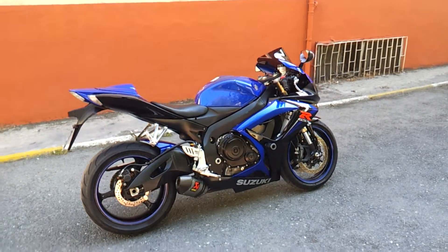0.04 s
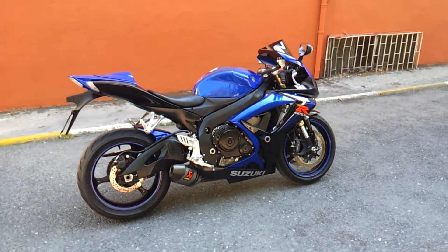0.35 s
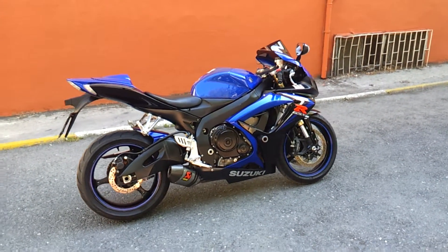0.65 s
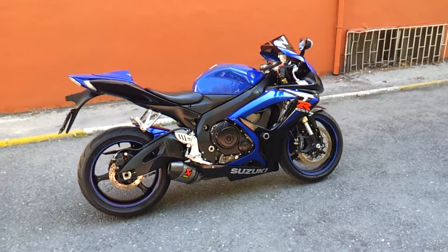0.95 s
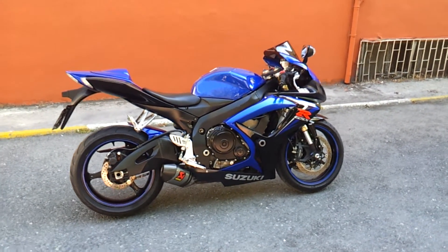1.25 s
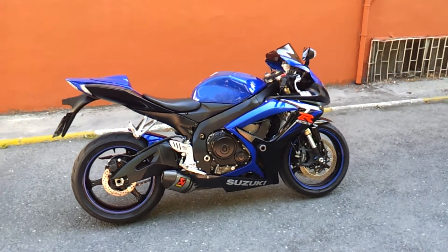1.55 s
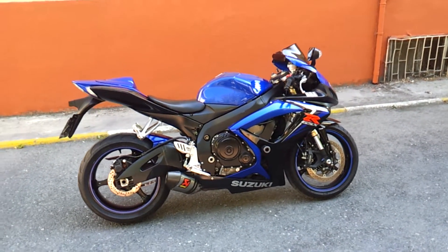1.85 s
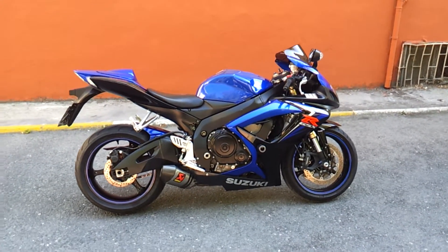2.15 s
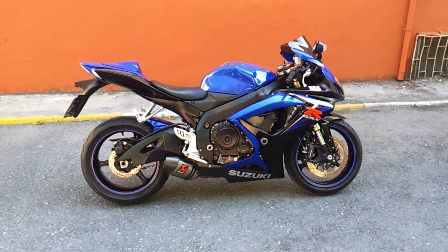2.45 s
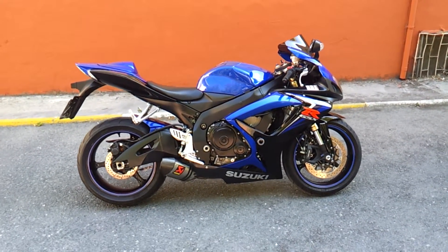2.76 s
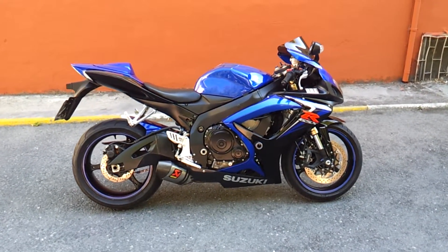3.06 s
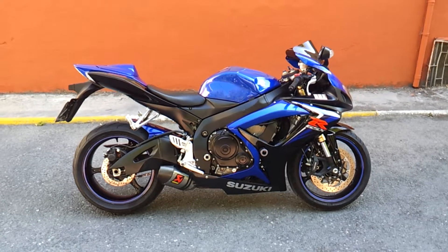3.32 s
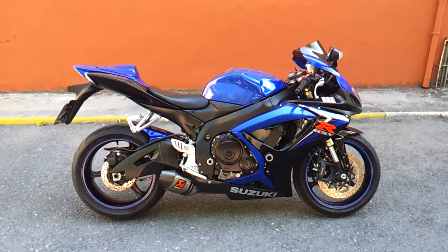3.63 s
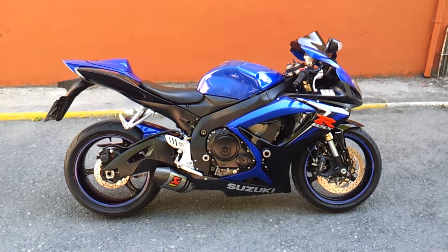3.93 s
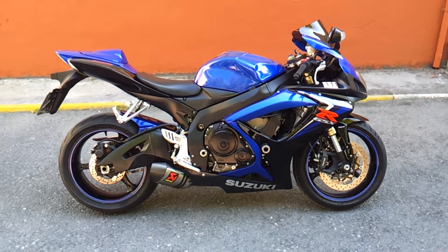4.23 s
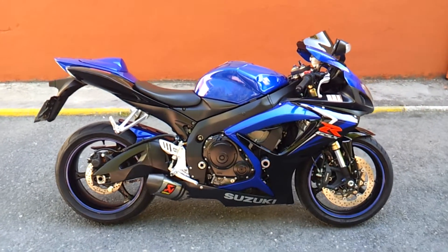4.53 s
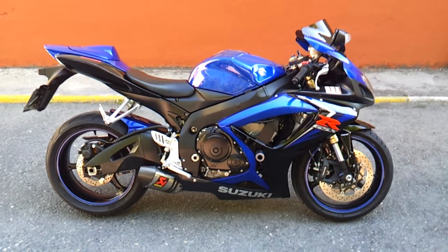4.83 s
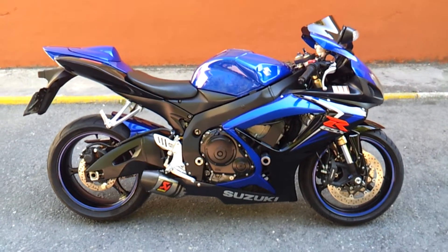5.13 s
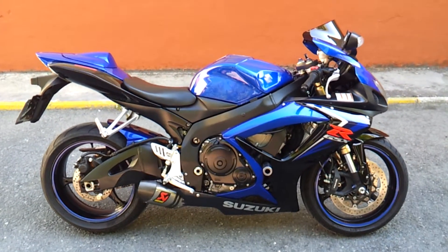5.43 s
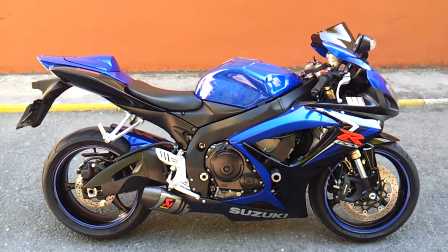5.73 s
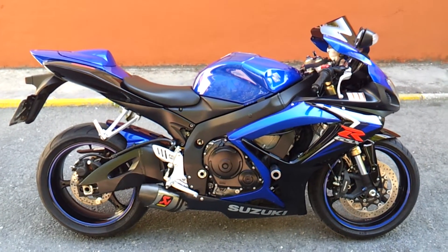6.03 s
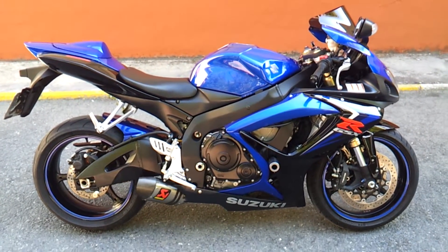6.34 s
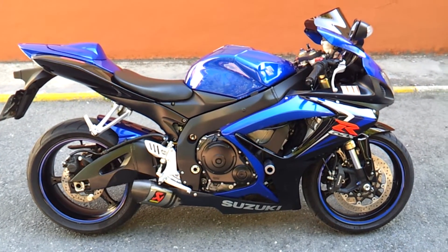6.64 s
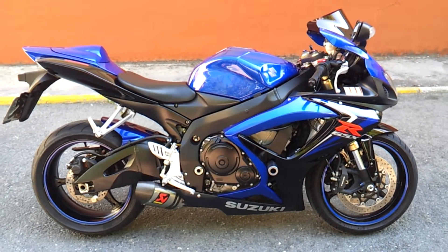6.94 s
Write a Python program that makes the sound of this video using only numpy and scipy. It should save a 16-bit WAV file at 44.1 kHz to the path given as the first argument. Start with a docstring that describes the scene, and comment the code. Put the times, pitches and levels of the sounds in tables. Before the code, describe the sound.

A quiet hum of distant traffic and an airy hiss fill a narrow street for about seven seconds. Wind rumbles on the microphone at the start, with several low thumps between 0.3 and 1 second, and is gone by about 2 seconds. A nearby bird gives six short, harsh, high squawks from 0.3 to 2.9 seconds, roughly half a second apart, each falling in pitch and echoing off the walls. After a pause, three more come at about 3.8, 4.2 and 4.6 seconds, the middle one the raspiest. Just after 4.6 seconds, one sharp, close click with a soft rebound sounds on the hand-held device's case, the loudest peak. Shoes scuff faintly on asphalt, mostly between 4 and 6 seconds. Small distant birds chirp now and then from about 1 second, with a few thin whistles, and chirp more often from 5.6 seconds to the end.

```python
"""A squawking bird in a narrow street

A bird gives nine harsh, falling squawks, made in its voice box and shaped by its throat and beak.
The walls throw them back. Other birds chirp and whistle farther off, over the hum of the town.
Wind thumps on the microphone at first, shoes scuff the asphalt, and one sharp click with a soft
rebound rings the case of the hand-held recorder."""
import sys
import numpy as np
from scipy import signal
from scipy.fft import rfft, irfft
from scipy.io import wavfile
from scipy.ndimage import map_coordinates

SR = 44100
rng = np.random.default_rng(int(sys.argv[2]) if len(sys.argv) > 2 else 0)


def put_to_file(sound):
    """Save the sound as 16-bit audio at rate SR, in the file named by the first command-line argument."""
    columns = np.atleast_2d(sound).T  # one column per channel
    safe = np.clip(columns, -1, 1)
    whole_steps = np.round(safe * 32767)
    wavfile.write(sys.argv[1], SR, whole_steps.astype(np.int16))


N = 307818
T = np.arange(N) / SR


def squawking_bird(breath_db=-11, breath_flicker_db=3.0):
    """The near bird: a harsh voice and rushing breath pass through the same throat."""
    # (start [s], length [s], pitch [Hz], end pitch [Hz], lateness of the fall [power], level [dB],
    #  level change by the end [dB], rasp [0-1], opening flick [share of the pitch])
    squawks = [(0.338, .175, 2358, 1354, 5.6, -43.5, 2, 0.43, -.18),
               (0.721, .160, 1940, 1220, 3.16, -41.5, -6, .06, .24),
               (1.2, 0.15, 1894, 1170, 3.33, -41, -7, 0.09, 0.21),
               (1.768, 0.15, 1980, 1177, 3.36, -39, -6.5, 0.02, 0.055),
               (2.252, .157, 2054, 1200, 2, -41.5, -6.5, 0.15, .22),
               (2.748, 0.15, 2103, 1259, 2.2, -39, -6, 0.19, .15),
               (3.788, .156, 2181, 1359, 5.2, -36.5, -6, .45, .18),
               (4.153, .158, 2230, 1680, 2.8, -38.5, -2, 0.91, .1),
               (4.558, 0.13, 2155, 1597, 1.9, -41.5, -4, .15, 0.084)]
    # strength of harmonics 1 to 8, the whole multiples of the pitch (level [dB])
    harmonics = [-4.5, 2, -6.5, -2, -4, -9, -16, 0.5]
    # how throat and beak colour the voice (frequency [Hz], gain [dB])
    throat = [(1100, -2.5), (1750, -2), (2400, -7.5), (2900, -5), (3700, -0.5), (4400, -3), (5300, -10),
              (6100, 1), (6900, -2), (7700, -12.5), (9000, -13), (10500, -22.5), (15000, -39)]
    # in two harsh squawks the other side of the voice box holds a note of its own
    # (start [s], length [s], start pitch [Hz], end pitch [Hz], level [dB], rasp [0-1])
    held_notes = [(.390, 0.137, 2530, 2380, -59, 0.16), (4.160, 0.11, 2536, 2510, -52.5, .05)]
    calls = [squawk(*row) for row in squawks]
    voice = voice_box(calls, harmonics, throat, jitter=0.1023, flutter_hz=562.2, shimmer_db=5.0,
                      closed_db=-16, split=0.14)
    airflow = 0
    for rows in calls:
        _, level_db, rasp = in_time(rows)
        calling = (T > rows[0][0]) & (T < rows[-1][0])
        airflow = airflow + from_db(level_db) * np.sqrt(np.abs(rasp)) * calling
    air = signal.sosfilt(signal.butter(2, 4000, "high", fs=SR, output="sos"), noise(throat))
    second_voice = pure_notes(glides(held_notes))
    breath = air * airflow * from_db(breath_db + breath_flicker_db * wobble(120))
    return voice + second_voice + breath


def squawk(start, length, hz, end_hz, lateness, db, fade_db, rasp, flick):
    """One call as rows for voice_box: it scoops up, flicks, swells and clears, then falls ever faster."""
    progress = np.linspace(0, 1, 100)
    t = progress * length
    scoop = 0.1684 * np.exp(-t / 0.004)   # starts below the pitch and rises at once
    opening = 1 - scoop + flick * bump(t, at_s=0.0115, width_s=0.008)
    catching = bump(t, at_s=0.0297, width_s=0.01485)   # hoarse while the voice catches
    push = bump(t, at_s=0.0814, width_s=0.026)   # louder and clearer at the strongest push
    spent = progress ** lateness   # lower and hoarser as the voice gives out
    pitch = hz * opening * (1 - spent) + end_hz * spent
    level_db = db + 2.5 * push + fade_db * progress ** 3
    hoarseness = np.clip(rasp * (1 - 0.452 * push) + 0.23 * catching + 0.12 * spent, 0, 1)
    return np.column_stack([start + t, pitch, level_db, hoarseness])


def voice_box(calls, harmonics, throat, jitter, flutter_hz, shimmer_db, closed_db=0, split=0):
    """Harmonics slide through a fixed throat; rasp shakes their pitch (jitter) and level (shimmer)."""
    out = np.zeros(N)
    for rows in calls:   # (time [s], pitch [Hz], level [dB], rasp [0-1])
        t = np.arange(rows[0][0], rows[-1][0], 1 / SR)
        pitch, level_db, rasp = in_time(rows, t)
        shake = jitter * rasp * wobble(flutter_hz, len(t))
        waver = 0.0085 * wobble(68.93, len(t))
        phase = 2 * np.pi * np.cumsum(pitch * (1 + shake + waver)) / SR
        muffled_db = closed_db * bump(t, at_s=t[0], width_s=0.047)   # brightens as the beak opens
        tone = 0
        for k, db in enumerate(harmonics, 1):
            strength = from_db(db + at_hz(throat, k * pitch) + np.log(k) * muffled_db)
            tone = tone + strength * (k * pitch < SR / 2) * np.sin(k * phase)
            if k > 1:   # uneven vibrations add flickering tones halfway between the harmonics
                halfway = from_db(db + at_hz(throat, (k + .5) * pitch) + muffled_db)
                tone = tone + split * halfway * wobble(148.0, len(t)) * np.sin((k + .5) * phase)
        gain = from_db(level_db + shimmer_db * rasp * wobble(flutter_hz / 2, len(t)))
        add(out, t[0], tone * gain * signal.windows.tukey(len(t), .12))
    return out


def small_birds(length_s=.042, top_hz=6300, fade_db=4, rasp=0.793):
    """Each chirp starts as a hoarse burst, drops and ends on a short clear note."""
    # distant chirps (start [s], peak level [dB], pitch near the end [Hz])
    chirps = [(1.126, -51, 3060), (1.635, -57.5, 2730), (2.550, -55.5, 2540), (3.120, -54, 2490),
              (3.379, -64, 2690), (5.610, -55.5, 2730), (5.785, -54.5, 3260), (6.020, -55, 2710),
              (6.200, -56, 2770), (6.395, -57.5, 3040), (6.655, -59.5, 2720)]
    # how a small throat colours them (frequency [Hz], gain [dB])
    throat = [(2600, 0), (3600, -1.5), (4500, 0.5), (6200, 2), (7500, -6), (10000, -31), (15000, -20)]
    calls = [[(s, top_hz, db - fade_db, rasp),
              (s + length_s * 0.42, top_hz * .82, db, rasp),
              (s + length_s * .7, hz * 1.4, db - fade_db / 2, rasp),
              (s + length_s, hz * 1.25, db - fade_db, rasp / 10),
              (s + length_s * 1.4, hz * 1.04, db - 1.2 * fade_db, 0),
              (s + length_s * 1.7, hz * 0.91, db - 3.5 * fade_db, 0)] for s, db, hz in chirps]
    return voice_box(calls, [0, -12], throat, jitter=0.2, flutter_hz=598, shimmer_db=6.5)


def whistling_birds():
    """Far birds whistle and hoot on nearly level notes."""
    # (start [s], length [s], start pitch [Hz], end pitch [Hz], level [dB], rasp [0-1])
    whistles = [(3.39, 0.077, 3000, 2710, -67, 0.07), (3.45, 0.082, 7920, 7500, -63.5, 0),
                (3.66, .11, 7400, 7370, -64, 0.17), (5.16, 0.045, 1412, 1395, -62.5, 0.27),
                (5.30, 0.11, 1528, 1560, -65, 0.29), (5.82, 0.088, 898, 915, -63, 0.2),
                (6.79, .07, 3580, 3600, -67.5, 0.23)]
    return pure_notes(glides(whistles))


def pips(length_s=0.0036, sweep=0.084):
    """Thin notes that flick downward very fast."""
    # (start [s], level [dB], middle pitch [Hz])
    notes = [(2.063, -47, 7100), (2.0875, -42.5, 7100), (5.029, -46, 4580), (5.320, -50, 6960)]
    return pure_notes([[(s, hz * (1 + sweep), db, 0), (s + length_s, hz * (1 - sweep), db, 0)]
                       for s, db, hz in notes])


def pure_notes(calls):
    """The voice box whistles: one harmonic, with no colour from the throat."""
    return voice_box(calls, [0], [(1, 0), (SR, 0)], jitter=0.191, flutter_hz=207.3, shimmer_db=23)


def glides(notes, fade_db=-0.5):
    """Rows for voice_box: each note slides straight from one pitch to another and fades a little."""
    return [[(s, start_hz, db, rasp), (s + length, end_hz, db + fade_db, rasp)]
            for s, length, start_hz, end_hz, db, rasp in notes]


def case_clicks():
    """A hard snap and a soft rebound make the recorder's case ring."""
    # (time [s], level [dB], brightness of the contact [Hz])
    clicks = [(4.6338, 0, 15000), (4.6882, -16, 504)]
    # the case's own tones (frequency [Hz], level [dB], time to fade by 60 dB [s])
    case_tones = [(76, -47, 0.26), (170, -27.5, 0.032), (263, -35.5, 0.07), (383, -20.5, 0.034),
                  (561, -12, 0.015), (793, -20, 0.019), (1298, -23.5, 0.019), (1770, -18.5, 0.013),
                  (2720, -11, 0.0024), (4360, -7.5, 0.0025), (5700, 5, 0.0016), (7130, 3.5, .0024),
                  (11000, -14, 0.0017), (14800, -15, .0015)]
    out, t = np.zeros(N), T[:SR // 5]
    ring = sum((-1) ** k * from_db(db - 60 * t / fade_s) * np.sin(2 * np.pi * hz * t)
               for k, (hz, db, fade_s) in enumerate(case_tones))
    for s, db, bright_hz in clicks:
        softness = np.exp(-2 * np.pi * bright_hz / SR)
        add(out, s, from_db(db) * signal.lfilter([1 - softness], [1, -softness], ring))
    return out


def shoes(grit_db=-9, grit_decay_s=0.002, grain_db=3.0):
    """Soles rub over the asphalt and crack single grains of grit."""
    # (middle [s], level [dB], half length [s])
    scuffs = [(1.707, -65, 0.017), (4.056, -57, 0.028), (5.254, -51.5, 0.03), (5.31, -61, 0.021),
              (5.388, -54, 0.043), (5.798, -57.5, 0.029)]
    # cracking grains (time [s], relative level [dB])
    grit = [(1.7, -39), (1.814, -39), (3.742, -34.5), (4.034, -33), (4.513, -28), (5.25, -33.5)]
    # tone colour of sole on asphalt (frequency [Hz], relative level [dB])
    colour = [(300, -10), (900, 0.5), (1500, -1.5), (2100, -2.5), (3500, -13), (6900, -2.5), (10000, -16),
              (15000, -44)]
    rub = sum(from_db(db) * bump(T, s, width) for s, db, width in scuffs)
    cracks = sum(from_db(db + grit_db) * (T >= s) * np.exp(-np.abs(T - s) / grit_decay_s)
                 for s, db in grit)
    return noise(colour) * (rub * from_db(grain_db * wobble(200)) + cracks)


def wind(wind_db=-3, lumpy_db=2.5, breeze_db=-53, end_s=2.24, dying_s=0.44):
    """Swirling air rumbles on the microphone; the largest swirls pass as single swings of pressure."""
    # (peak time [s], relative level [dB], half length [s])
    gusts = [(0.124, -43.5, 0.094), (0.303, -43.5, .05), (0.563, -40.5, 0.06), (0.655, -41.5, 0.057),
             (.87, -41.5, 0.069), (0.989, -40, 0.048), (1.062, -42.5, 0.039), (1.19, -53, 0.076),
             (1.411, -49, .02), (1.67, -54, .02), (1.82, -50, 0.076)]
    # tone colour of the swirls (frequency [Hz], relative level [dB])
    colour = [(12, -31), (20, 0.5), (81, 7), (195, -5), (278, -14.5), (380, -22.5), (462, -28), (568, -41),
              (700, -39), (910, -61), (1540, -120)]
    # single large swirls (time [s], peak level [dB], frequency [Hz])
    thumps = [(0.353, -39, 106), (0.547, -41, 90), (.564, -22, 151), (.900, -34, 90), (.957, -26.5, 174),
              (.985, -31, 100)]
    strength = from_db(breeze_db) + sum(from_db(db) * bump(T, s, width) for s, db, width in gusts)
    level_db = 20 * np.log10(strength)
    dying = np.clip((end_s - T) / dying_s, 0, 1)
    swirls = noise(colour)
    bass = signal.sosfiltfilt(signal.butter(2, 150, fs=SR, output="sos"), swirls)
    swirls = bass + (swirls - bass) * from_db(level_db + 41.5)   # weak gusts sound duller
    out = swirls * from_db(level_db + wind_db + lumpy_db * wobble(29)) * dying
    for s, db, hz in thumps:
        phase = 2 * np.pi * hz * (T - s)
        out = out + from_db(db) * phase * np.exp((1 - phase ** 2) / 2)
    return out


def town(hum_db=-58, hiss_db=-60.5):
    """Far traffic hums under a steady airy hiss."""
    # tone colours of the traffic and the hiss (frequency [Hz], relative level [dB])
    hum = [(12, -26), (20, -3), (53, 2), (164, -1), (281, -2), (513, -6.5), (736, -6), (830, -7),
           (899, -7.5), (1240, -8), (1710, -12.5), (2400, -17.5), (3120, -45), (5280, -120)]
    hiss = [(1060, -22), (1800, 5), (1930, -7), (2300, -5.5), (2680, -1.5), (2900, -5), (3150, -3),
            (4720, -2), (5400, -3), (5970, 0), (7400, -1.5), (9280, -10.5), (14700, -14.5), (15500, -12.5)]
    return noise(hum) * from_db(hum_db) + noise(hiss) * from_db(hiss_db)


def street(x, direct_db, scatter_db, tail_db, scatter_s=0.017, build_s=0.03):
    """The walls return a few clear echoes, a brief dense scatter, then a tail whose bass dies first."""
    # echoes from ground and walls (delay [s], level relative to direct_db [dB])
    echoes = [(.0048, -9), (.020, -9), (.038, -3)]
    # how long the street rings (frequency [Hz], time to fade by 60 dB [s])
    fade_times = [(500, 0.17), (1800, 0.64), (3600, 0.85), (7000, 0.88), (14000, 0.84)]
    t, tail = T[:SR], 0
    edges_hz = np.geomspace(200, 16000, 10)
    for low, high in zip(edges_hz, edges_hz[1:]):
        band_filter = signal.butter(2, [low, high], "band", fs=SR, output="sos")
        band = signal.sosfilt(band_filter, rng.standard_normal(SR))
        tail = tail + band * from_db(-60 * t / at_hz(fade_times, np.sqrt(low * high)))
    tail = from_db(tail_db) * rms_one(tail * (1 - np.exp(-t / build_s)))
    scatter = rms_one(rng.standard_normal(SR) * np.sqrt(t) * np.exp(-t / scatter_s))
    response = (from_db(scatter_db) * scatter + tail) / np.sqrt(SR)
    for delay, db in [(0, 0.024)] + list(echoes):
        response[round(delay * SR)] += from_db(direct_db + db)
    return signal.fftconvolve(x, response)[:N]


def from_db(db):
    """Turn decibels into a factor to multiply by."""
    return 10 ** (np.asarray(db) / 20)


def rms_one(x):
    """Scale a signal so that its average size (rms) is 1."""
    return x / np.sqrt(np.mean(x ** 2) + 1e-20)


def bump(t, at_s, width_s):
    """A bell-shaped rise and fall of height 1."""
    return np.exp(-((t - at_s) / width_s) ** 2)


def in_time(rows, t=T):
    """Join rows (time [s], values...) with straight lines and read each value at the times t."""
    times, *columns = np.transpose(rows)
    return [np.interp(t, times, column) for column in columns]


def at_hz(points, hz):
    """Read a curve of (frequency [Hz], value) points, with octaves evenly spaced."""
    frequencies, values = np.transpose(points)
    return np.interp(np.log(np.maximum(hz, 1)), np.log(frequencies), values)


def noise(colour):
    """Noise of the given tone colour and average size 1."""
    gains = from_db(at_hz(colour, np.fft.rfftfreq(N, 1 / SR)))
    return rms_one(irfft(rfft(rng.standard_normal(N)) * gains, N))


def wobble(rate_hz, size=N):
    """A smooth random wiggle of average size 1."""
    positions = np.arange(size) * 2 * rate_hz / SR
    points = rng.standard_normal(int(positions[-1]) + 2)
    return rms_one(map_coordinates(points, [positions], order=3, mode="nearest"))


def add(out, start_s, x):
    """Mix x into out at the given time."""
    i = max(0, round(start_s * SR))
    out[i:i + len(x)] += x[:max(0, N - i)]


def scene():
    """Mix the street; the small birds are out of sight and are heard almost only by way of the walls."""
    squawks = street(squawking_bird(), direct_db=-2.5, scatter_db=-8.0, tail_db=-3.5)
    chirps = street(small_birds(), direct_db=-44, scatter_db=2, tail_db=-5.5)
    whistles = street(whistling_birds(), direct_db=0.5, scatter_db=0, tail_db=-8.5)
    close = shoes() + pips() + case_clicks()
    close_echo = street(close, direct_db=-58.5, scatter_db=-43, tail_db=-32)
    return (squawks + chirps + whistles + close + close_echo + wind() + town())[None]


def record(dry):
    """Peaks that overload are flattened, then the treble above 15600 Hz is cut."""
    treble_cut = signal.ellip(10, .2, 70, 15600, fs=SR, output="sos")
    return signal.sosfilt(treble_cut, np.clip(dry, -1, 1))


dry = scene()
out = record(dry)
put_to_file(out)
```